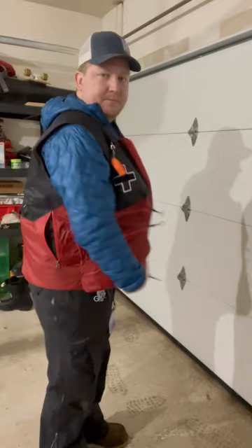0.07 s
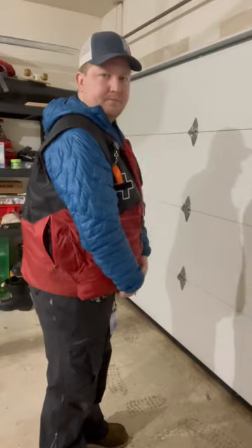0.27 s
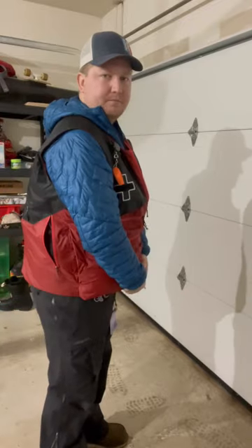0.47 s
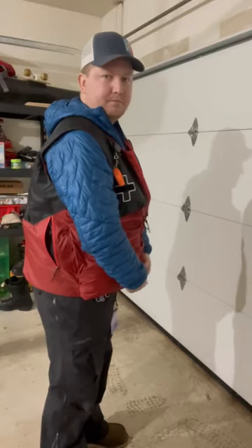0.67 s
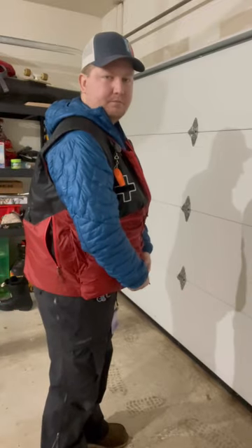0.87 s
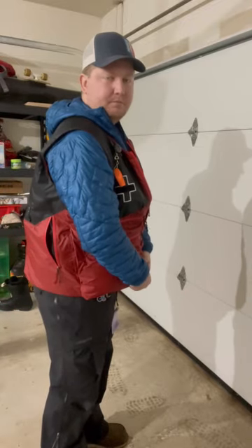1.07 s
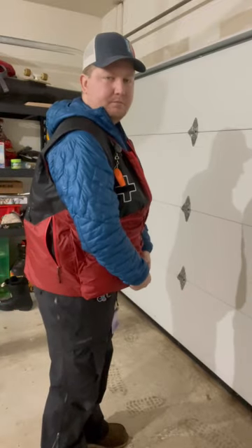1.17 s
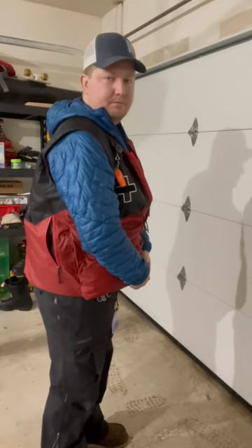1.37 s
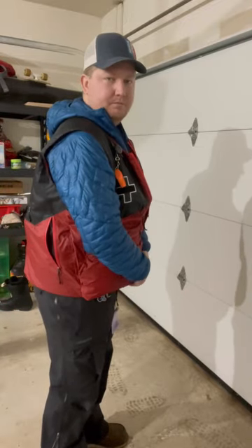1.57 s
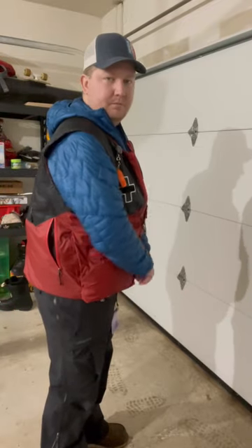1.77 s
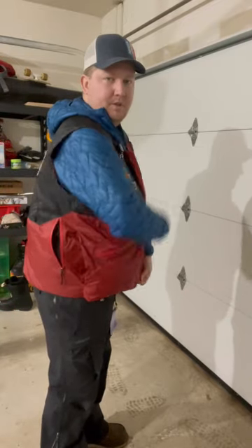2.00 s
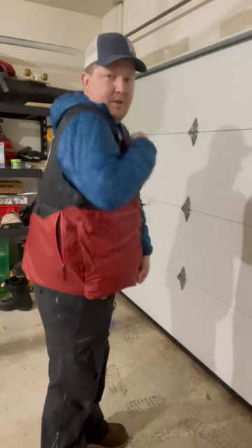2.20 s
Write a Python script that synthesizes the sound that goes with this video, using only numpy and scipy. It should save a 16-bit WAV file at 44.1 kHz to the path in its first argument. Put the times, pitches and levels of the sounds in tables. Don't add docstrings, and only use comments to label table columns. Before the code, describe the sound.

Slippery padded clothing rustles and crackles, quietens to sparse faint ticks, snaps again, then ends in a dense swish with short rubbing squeaks; quiet garage with slight echo and faint low hum, stereo phone mic.

```python
import sys
import numpy as np
from scipy import signal
from scipy.fft import rfft, irfft, next_fast_len
from scipy.io import wavfile
from scipy.ndimage import uniform_filter1d

SR = 44100
rng = np.random.default_rng(int(sys.argv[2]) if len(sys.argv) > 2 else 0)


def undo_db(level):
    steps = np.asarray(level, float) / 20
    return 10 ** steps


def persist_wave(psi):
    counts = np.round(np.clip(psi, -1, 1) * 32767).astype(np.int16)
    wavfile.write(sys.argv[1], SR, np.atleast_2d(counts).T)


N = 98695

# f/Hz, density/dB per Hz
NYLON_SPECTRUM = [(59, -81), (100, -10.5), (490, -7), (1140, -11), (6360, -16.5), (7860, -13),
                  (8740, -12.5), (11500, -18.5), (15800, -21)]


def level(x, db):
    return x * undo_db(db) / np.sqrt(np.mean(x ** 2))


def read(table, hz, log=True):
    f, v = np.array(table, float).T
    if log:
        return np.interp(np.log(hz + 1), np.log(f + 1), v)
    return np.interp(hz, f, v)


def colour(x, spectrum):
    gain_db = read(spectrum, np.fft.rfftfreq(2048, 1 / SR))
    cepstrum = irfft(gain_db * np.log(10) / 20)
    cepstrum[1:1024] *= 2
    cepstrum[1025:] = 0
    impulse = irfft(np.exp(rfft(cepstrum)))
    return signal.fftconvolve(x, impulse)[:N]


def walk(rate_hz):
    hold = int(SR / rate_hz)
    steps = np.repeat(rng.standard_normal(2000), hold)[:N]
    return 1.3 * uniform_filter1d(uniform_filter1d(steps, hold), hold)


def slips(share, spread_db, floor_db):
    u = rng.random((3, N))
    size_db = np.minimum(-spread_db * np.log(u[2] + 1e-9), 13)
    clicks = (u[0] < share) * np.sign(u[1] - .5) * undo_db(size_db)
    bed = undo_db(floor_db) * rng.standard_normal(N)
    return level(level(clicks, 0) + bed, 0)


def rub(t, curve, spectrum, share):
    # f/Hz, density/dB per Hz
    padding_spectrum = [(90, -38), (180, -4.5), (260, 5.5), (500, 0), (900, -5), (2000, -9.5),
                        (5000, -69.5)]
    s, db, pad_db = np.array(curve).T
    gain = undo_db(np.interp(t, s, db, left=-120, right=-120) + walk(29.36))
    shell = level(colour(slips(share, 4.1, -0.06), spectrum), 0)
    thrum = slips(.01, 2.5, 0) * undo_db(1.5 * walk(40))
    pad = level(colour(thrum, padding_spectrum), -5.5) * undo_db(np.interp(t, s, pad_db))
    return gain * (shell + pad)


def sleeve_sweep(t):
    # t/s, sliding level/dB, padding share/dB
    sweep = [(1.8, -76, -14), (1.837, -54.5, -5), (1.851, -42.5, 4.5), (1.884, -40.5, 6.5), (1.914, -36, 2),
             (2.056, -32.5, -1.5), (2.151, -32.5, -5), (2.221, -43.5, 4.5), (2.238, -42, -3)]
    # f/Hz, density/dB per Hz
    sleeve_spectrum = [(59, -37), (100, -19.5), (500, -7.5), (850, -13.5), (6090, -21.5), (8740, -17),
                       (11800, -20.5), (14500, -21.5), (15800, -23.5)]
    return rub(t, sweep, sleeve_spectrum, .06)


def body_motion(t):
    # t/s, sliding level/dB, padding share/dB
    motion = [
        [(0, -40.5, -2.5), (.1, -44, -7.5), (.19, -45, -23), (.245, -49.5, -2), (.29, -49.5, -8), (.45, -54, 0),
         (.55, -65.5, 7.5)],
        [(.6, -58, 5), (.67, -58.5, 1), (.86, -64, 2.5), (.91, -60.5, -2), (.925, -59.5, 6), (.98, -61, 5),
         (1.0, -65.5, 8), (1.06, -74.5, 13), (1.24, -80.5, 8)],
        [(1.268, -66.5, -2), (1.29, -61, 4.5), (1.365, -64, 7.5), (1.395, -61, 8), (1.435, -60, 6.5),
         (1.49, -61, 3), (1.56, -55, -8), (1.615, -49.5, 2.5), (1.66, -54, -10), (1.69, -52, -4),
         (1.78, -57.5, 0.5), (1.84, -51, -19)],
    ]
    return rub(t, np.vstack(motion), NYLON_SPECTRUM, .04)


def folds(t):
    # t/s, peak/dB, crease share/dB, decay/s
    snap_events = [(0.05, -32, -2, 0.0069), (0.085, -37, -7, .005), (.131, -33, -7, .004),
                   (0.274, -26, -11, 0.021), (0.5143, -49, 11.5, 0.013), (0.5834, -39.5, 6, 0.0086),
                   (0.605, -51, 13, 0.006), (0.614, -55, 13, 0.01), (0.7603, -45, 13, 0.01),
                   (0.935, -39, -12, 0.014), (0.964, -54, 11.5, 0.021), (1.135, -53.5, 10.5, 0.011),
                   (1.3772, -33.5, 6, 0.012), (1.4475, -33, -7, 0.01), (1.5173, -46.5, 13.5, 0.0067),
                   (1.84, -28, -1, 0.003), (1.846, -31, 8, 0.006), (0.808, -47, 13, 0.0046),
                   (1.683, -37, -5, 0.0065)]
    # f/Hz, density/dB per Hz
    crease_spectrum = [(150, -35), (400, 10.5), (700, -1.5), (2000, -3.5), (3500, -6.5), (8000, -45)]
    attack_s = 0.00048
    shell, body = np.zeros(N), np.zeros(N)
    for s, db, body_db, decay_s in snap_events:
        age = np.maximum(t - s, 0)
        fade = undo_db(db) * (1 - np.exp(-age / attack_s)) * np.exp(-age / decay_s)
        shell += fade
        body += fade * undo_db(body_db)
    grit = slips(.05, 3, 0)
    crumple = slips(.02, 3, 0)
    crackle = colour(grit * shell, NYLON_SPECTRUM) / np.std(colour(grit, NYLON_SPECTRUM))
    crease = level(colour(crumple, crease_spectrum), 0) * body
    return undo_db(-12.5) * crackle + undo_db(-16.0) * crease


def ticks(t):
    # t/s, peak/dB, f/Hz, ring/s
    tick_events = [(0.2735, -32, 2630, 0.00021), (0.2748, -28.5, 2800, 0.00029), (.607, -51, 1910, 0.00058),
                   (1.257, -39.5, 4930, 0.00038), (1.377, -27.5, 2510, 0.000092),
                   (1.3803, -31.5, 2800, 0.000048), (1.4531, -35, 3720, 0.00026),
                   (1.499, -42.5, 6440, .0005), (.513, -48, 11400, .0004), (0.5162, -45.5, 11400, .0007),
                   (0.5208, -46, 11500, .0004), (.587, -52, 11500, .0004), (0.59, -48, 11600, .0007),
                   (0.6057, -39.5, 890, 0.00076), (0.936, -37, 9600, 0.00022), (.953, -54, 3500, .0003),
                   (.971, -62, 1400, 0.00053), (1.1365, -54, 1910, 0.0007), (1.446, -49, 9000, .0001),
                   (1.449, -44, 3000, 0.00022), (1.5785, -50, 5000, 0.00034), (1.599, -37, 2200, 0.00037),
                   (1.6117, -35, 2490, 0.00038), (1.797, -49, 11700, .0004), (1.8391, -36, 7000, .0002),
                   (1.8504, -47, 11100, .0002), (1.914, -28, 900, 0.00069)]
    out = np.zeros(N)
    for s, db, hz, ring_s in tick_events:
        age = np.maximum(t - s, 0)
        fade = (1 - np.exp(-3 * age / ring_s)) * np.exp(-age / ring_s)
        out -= undo_db(db + 4) * np.sin(2 * np.pi * hz * age) * fade
    return out


def squeaks(t):
    # centre t/s, slip rate f/Hz, level/dB, half length/s, overtones/dB
    rib_notes = [(1.857, 291, -49, 0.016, -1), (1.866, 428.4, -43, 0.018, -3), (1.907, 610, -38, 0.036, -8),
                 (1.925, 483, -34.5, 0.054, -17), (1.939, 430.1, -22, 0.0088, -23),
                 (1.958, 376, -35.5, 0.023, -19), (1.988, 413.7, -32, 0.025, -6),
                 (2.009, 243, -27.5, 0.015, -4.5), (2.028, 562, -30, 0.027, -6),
                 (2.011, 350, -34, 0.049, -14), (2.051, 1253, -32.5, 0.0088, -14),
                 (2.052, 340, -33.5, 0.02, -14), (2.051, 651, -30, 0.01, -10),
                 (2.061, 1096, -33.5, 0.014, -28), (2.086, 505.5, -34, 0.028, -9),
                 (2.093, 943, -33, 0.02, -21), (2.112, 1064, -30, 0.0072, -28),
                 (2.141, 542.3, -26, 0.031, -14), (2.142, 974, -30, 0.021, -48),
                 (2.169, 756, -35.5, 0.017, -18), (2.171, 502.4, -27, 0.0083, -9),
                 (2.182, 242.4, -38, 0.014, -26), (2.197, 531.7, -36, 0.02, -8),
                 (1.882, 1860, -42, 0.0069, -25), (1.996, 1310, -33, 0.0089, -25),
                 (2.028, 1100, -38, .012, -20), (2.038, 1290, -34, 0.011, -14),
                 (2.047, 1800, -40.5, 0.021, -18), (2.088, 1408, -35, 0.0083, -25),
                 (2.128, 2200, -53, 0.022, -25), (2.135, 1083, -31.5, 0.015, -13),
                 (2.222, 1063, -42, 0.0076, -22)]
    more_notes = [(.007, 300, -41.5, 0.009, -8), (0.015, 440, -39, 0.0084, -10),
                  (0.037, 400, -48, 0.018, -10), (.052, 330, -51, 0.01, -13), (0.058, 400, -47, 0.008, -3),
                  (0.083, 300, -44, 0.012, -10), (0.094, 410, -45, 0.0064, -7), (.11, 400, -46, 0.013, -12),
                  (0.116, 205, -46, 0.011, -17), (0.13, 280, -54.5, 0.01, 0),
                  (0.152, 350, -51, 0.0081, -13), (0.184, 550, -46.5, 0.0066, -18),
                  (0.029, 620, -50, 0.014, -8), (0.038, 560, -55, .01, -7), (0.103, 650, -67, 0.01, -9),
                  (0.144, 800, -48.5, 0.016, -29), (0.613, 1830, -53, 0.0044, -22),
                  (0.63, 2100, -60, 0.0093, -15), (0.969, 1350, -59.5, 0.012, -18),
                  (.976, 900, -61.5, 0.012, -24)]
    jitter, glide = .02, .02
    out = np.zeros(N)
    for s, hz, db, length_s, over_db in rib_notes + more_notes:
        u = np.clip((t - s) / length_s, -1, 1)
        rate_hz = hz * (1 + jitter * walk(150) + glide * u)
        phase = 2 * np.pi * np.cumsum(rate_hz) / SR
        wave = np.sin(phase)
        for k in range(3):
            wave += undo_db(over_db - 8.4 * k) * np.sin((k + 2) * phase + k)
        out += undo_db(db + 5) * np.cos(np.pi * u / 2) ** 2 * wave
    return out


def shifts(t):
    # t/s, level/dB, f/Hz, half length/s
    shift_events = [(0.043, -51.5, 60.6, 0.17), (0.092, -56.5, 135.5, 0.079), (0.436, -60, 56.6, 0.062),
                    (1.017, -55.5, 107, 0.045), (1.382, -53.5, 55.5, 0.11), (1.416, -58, 128.5, 0.087),
                    (1.797, -59.5, 66.5, 0.076), (1.975, -44.5, 123.3, 0.073), (2.092, -41.5, 132, 0.061)]
    out = np.zeros(N)
    for s, db, hz, length_s in shift_events:
        swell = np.cos(np.pi / 2 * np.clip((t - s) / length_s, -1, 1)) ** 2
        out += undo_db(db - 1.0) * swell * np.sin(2 * np.pi * hz * (t - s))
    return out


def apart(a, b):
    wall_top_hz, shared_below_hz = 7000, 320
    a, b = signal.sosfilt(signal.butter(5, wall_top_hz, fs=SR, output="sos"), [a, b])
    b = signal.sosfilt(signal.butter(4, shared_below_hz, "high", fs=SR, output="sos"), b)
    return np.array([a + b, a - b]) / np.sqrt(2)


def echo_fade(t, t60_s):
    return level(10 ** (-3 * t / t60_s), 0) * (t > .002) / np.sqrt(N)


def walls_of(x, t, near_db):
    near_t60_s, room_t60_s, room_db = .04, .5, -9
    fade = undo_db(near_db) * echo_fade(t, near_t60_s) + undo_db(room_db) * echo_fade(t, room_t60_s)
    echo = rng.standard_normal((2, N)) * fade
    return apart(*signal.fftconvolve(x[None], echo)[:, :N])


def garage_air():
    # f/Hz, density/dB per Hz
    air_spectrum = [(12, -25), (20, -5), (96, 6.5), (126, 5.5), (192, -6.5), (754, -12.5), (867, -19),
                    (1890, -22), (15800, -32.5)]
    return level(colour(rng.standard_normal(N), air_spectrum), -66.5)


def hum():
    # f/Hz, level/dB
    hum_tones = [(59, -66.5), (126, -84)]
    out = np.zeros(N)
    for hz, db in hum_tones:
        phase = 2 * np.pi * np.cumsum(hz * (1 + 0.044 * walk(12.35))) / SR
        out += undo_db(db + 3 * walk(8)) * np.sin(phase)
    return out


def wash(t):
    return undo_db(-1.0) * (body_motion(t) + sleeve_sweep(t)) + garage_air()


def scene():
    # f/Hz, left lead/rad
    port_lead = [(0, 0), (6300, .3), (7200, 2), (8200, 3), (9350, 3.4), (11000, 6.1), (12400, 6.5),
                 (13900, 9.2), (15000, 9.7), (15800, 11.2)]
    # f/Hz, share by which the right hears more
    right_lean = [(20, .22), (80, .22), (125, .06), (300, .04), (500, .2), (1200, .2), (2500, 0)]
    snap_slant = .87
    spread_db = 4.5
    t = np.arange(N) / SR
    snaps = undo_db(-0.5) * (folds(t) + ticks(t))
    notes = undo_db(-1) * squeaks(t)
    steady = wash(t)
    rest = notes + steady + shifts(t) + hum()

    size = next_fast_len(N + 512)
    hz = np.fft.rfftfreq(size, 1 / SR)
    lead = .5j * read(port_lead, hz, log=False) * np.array([[1], [-1]])
    direct_spectrum = rfft(rest, size) * np.exp(lead) + rfft(snaps, size) * np.exp(snap_slant * lead)
    direct = irfft(direct_spectrum, size)[:, :N]
    lean = irfft(rfft(snaps + rest, size) * read(right_lean, hz), size)[:N]
    spread = undo_db(spread_db) * apart(wash(t), wash(t))
    walls = walls_of(snaps + notes, t, -4.5) + walls_of(steady, t, -90)
    return direct + np.array([[-1], [1]]) * lean + spread + walls


def low_pass(x):
    return signal.sosfilt(signal.butter(12, 15960, fs=SR, output="sos"), x)


def record(dry):
    top_hz = 15820
    mix = signal.sosfilt(signal.ellip(10, .2, 70, top_hz, fs=SR, output="sos"), dry)
    return low_pass(mix)


dry = scene()
out = record(dry)
persist_wave(out)
```